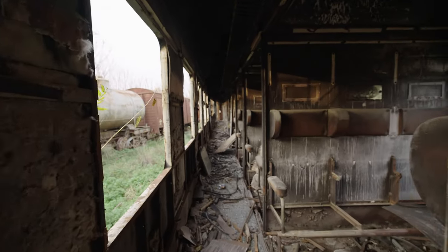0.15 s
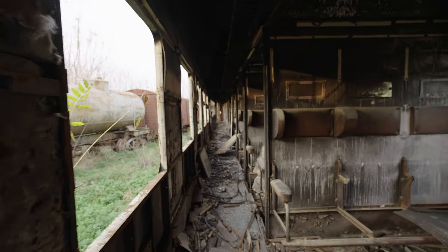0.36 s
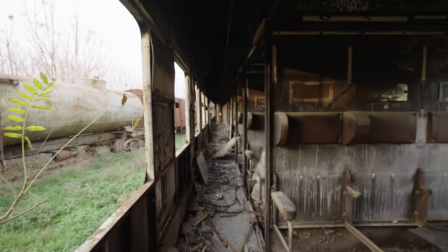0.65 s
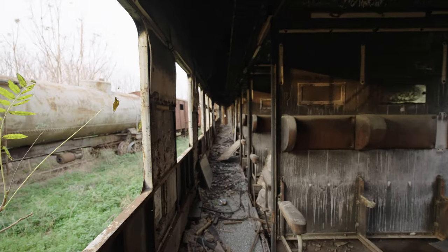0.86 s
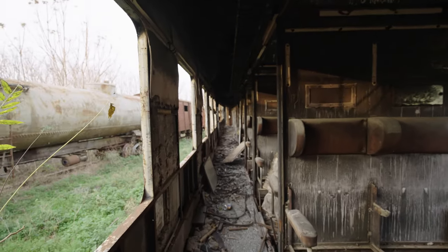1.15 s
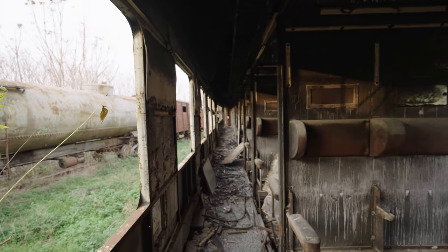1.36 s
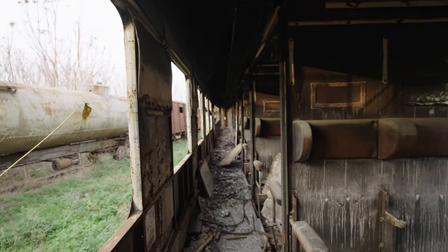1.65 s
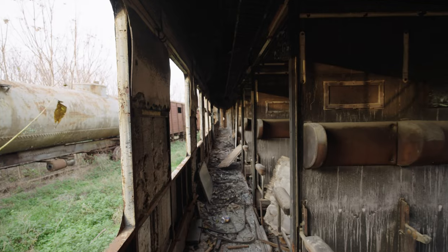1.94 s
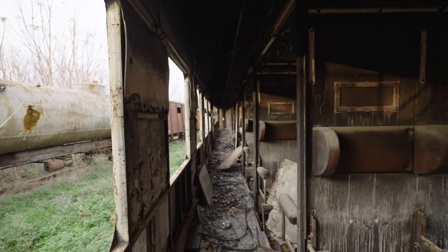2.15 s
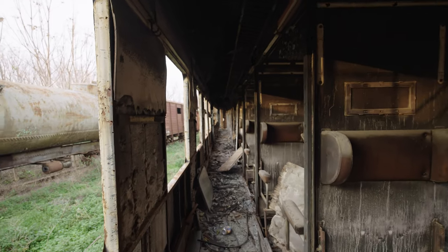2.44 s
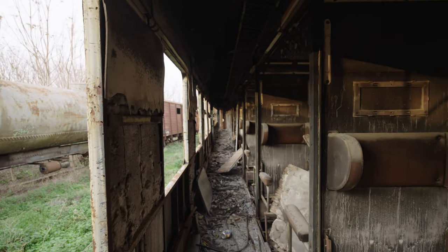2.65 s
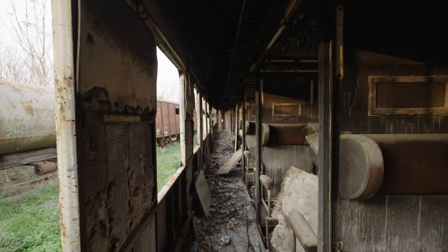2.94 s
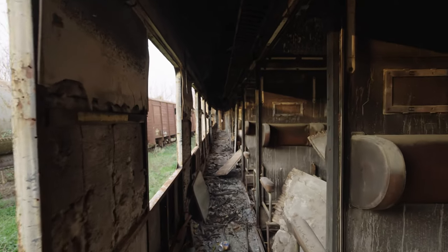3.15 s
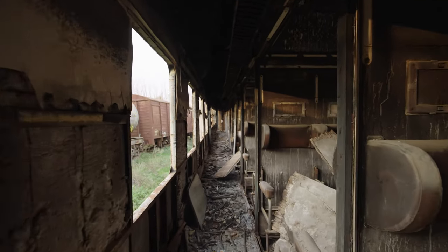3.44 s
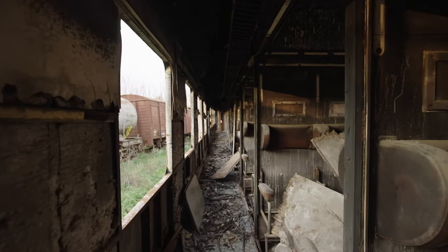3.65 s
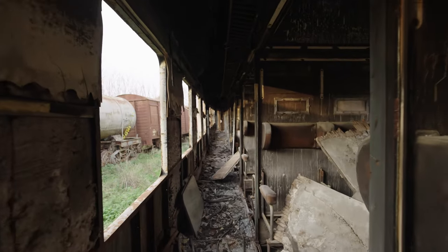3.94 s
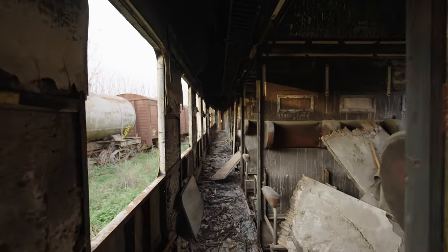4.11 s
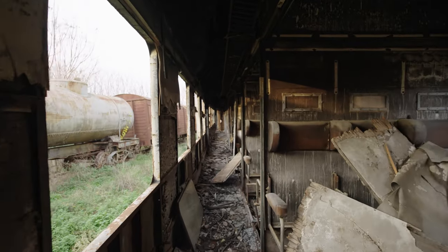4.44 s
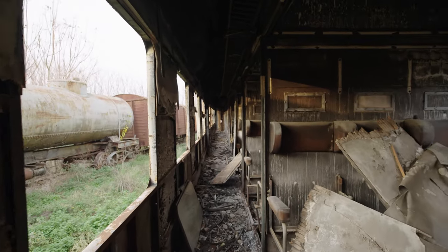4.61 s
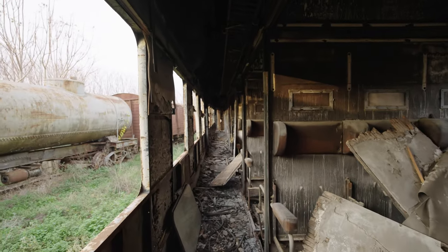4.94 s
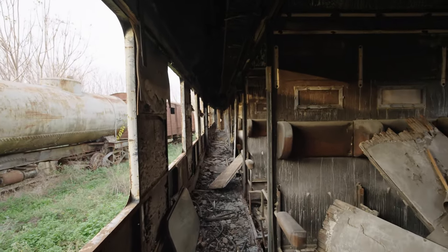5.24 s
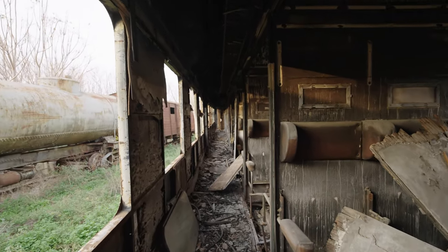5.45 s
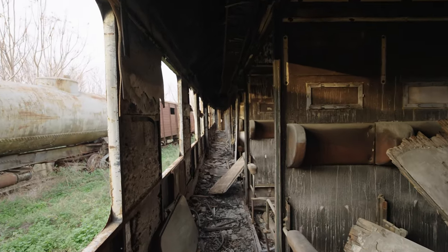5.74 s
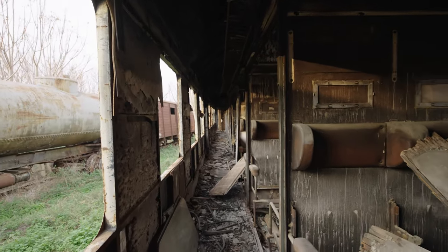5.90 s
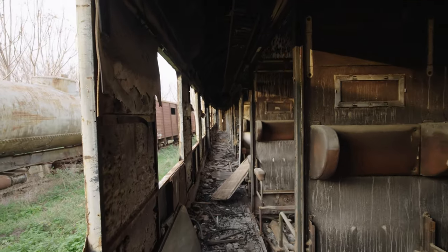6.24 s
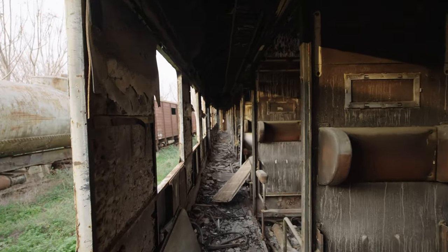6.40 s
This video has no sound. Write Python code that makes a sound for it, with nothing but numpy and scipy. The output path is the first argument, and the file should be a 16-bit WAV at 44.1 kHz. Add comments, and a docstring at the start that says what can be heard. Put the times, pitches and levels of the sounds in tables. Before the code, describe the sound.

Slow footsteps crunch and snap over brittle debris in a derelict railway carriage, glass clinking underfoot, with faint low rumble from outside.

```python
"""Corridor of a derelict railway carriage: slow steps over flakes of paint, board and glass, in one channel.
Each foot thuds on the hollow floor, snaps and splinters pieces and grinds grit; soles scuff, a board creaks,
glass clinks and once squeaks. Blows and grains drive damped resonances, glass is a sum of decaying sines;
the near sound is mixed with a short bright reverberation from the bare compartments.
From farther off, faint rumble and a low hum come through the open windows."""
import sys
import numpy as np
from scipy import signal
from scipy.fft import rfft, irfft
from scipy.io import wavfile
from scipy.ndimage import map_coordinates

SR = 44100
rng = np.random.default_rng(int(sys.argv[2]) if len(sys.argv) > 2 else 0)


def put_to_file(sound):
    """Save the sound as 16-bit audio at rate SR, in the file named by the first command-line argument."""
    columns = np.atleast_2d(sound).T  # one column per channel
    safe = np.clip(columns, -1, 1)
    whole_steps = np.round(safe * 32767)
    wavfile.write(sys.argv[1], SR, whole_steps.astype(np.int16))


N = 289781
TIME = np.arange(N) / SR  # s
BLOW = int(.4 * SR)  # samples kept of each blow and of the reverberation
ATTACK = int(.03 * SR)  # samples over which the level of a blow is set

# Step levels below apply before the carriage body colours them and the steps are trimmed.
# Air outside, spectrum shape before levelling: pitch_hz [Hz], density_db [dB per Hz, relative]
OUTDOOR_AIR = [(35, -33), (60, -0.5), (103, -4), (160, -9), (222, -1.5), (281, -14), (503, -15.5),
               (636, -19), (732, -12), (785, -18), (1410, -22), (7400, -29), (16000, -39)]
AIR_DB = -54.5
# Swelling hum from outside: time_s [s], level_db [dB]
HUM_SWELL = [(0, -67), (5.0, -64.5), (5.5, -53.5), (6.0, -52.5), (6.57, -51.5)]
HUM_HZ = 149
# Weight bearing on the debris: start_s [s], length_s [s], grit_db [dB], boards_db [dB]
FOOT_LOADS = [(0, 0.035, -56.5, -55), (0.304, 0.5, -50.5, -54), (0.762, 0.51, -46.5, -48.5),
              (1.41, 0.27, -51, -52), (1.918, 0.27, -44, -45), (2.31, 0.35, -53, -57.5),
              (2.75, 0.51, -55, -54), (3.112, .32, -47, -47.5), (4.014, 0.36, -52, -48),
              (4.75, .03, -55.5, -54), (4.93, 0.14, -53, -53), (5.182, .08, -53.5, -55),
              (5.321, 0.13, -30.5, -43), (5.586, 0.16, -44.5, -51.5), (5.8, 0.16, -55, -59.5),
              (6.01, 0.3, -42.5, -44.5), (6.462, .11, -56, -52.5)]
LOAD_S, UNLOAD_DB_PER_S = .04, 118  # the weight comes on quickly and eases off
GRIT_REST_DB, BOARDS_REST_DB = -76, -57.5  # under the standing foot
# Soles sliding and a board creaking (the 1450 Hz row at 1.95 s is the creak):
# start_s [s], peak_s [s], end_s [s], level_db [dB], pitch_hz [Hz], grain_rate [grains per s]
SCUFFS_AND_CREAK = [(0.255, 0.258, .34, -34.5, 3930, 3000), (1.953, 2.147, 2.25, -36.5, 1450, 280),
                    (1.949, 2.168, 2.3, -35, 7900, 1100), (2.188, 2.215, 2.265, -37.5, 4500, 3000),
                    (2.875, 2.936, 2.962, -25.5, 1210, 3000), (2.872, 2.95, 2.98, -26, 6200, 7100),
                    (3.949, 3.999, 4.1, -32, 5970, 4800), (3.959, 4.082, 4.12, -35, 1400, 1800),
                    (5.322, 5.427, 5.5, -27, 3970, 690), (5.33, 5.457, 5.5, -26.5, 8650, 1100),
                    (5.572, 5.655, 5.74, -31, 8050, 970)]
# Pieces breaking under the shoe: start_s [s], snap_db [dB], snap_hz [Hz], splinter_db [dB],
# splinter_hz [Hz], direct [share of the snap's power that arrives directly, 0-1]
BREAKING_PIECES = [(.265, -36.5, 1860, -38.5, 7500, 0.23), (.301, -37, 1630, -37.5, 6800, 0.55),
                   (.49, -51, 2500, -55, 9000, .1), (0.539, -45.5, 1290, -46, 8100, 0.82),
                   (.5716, -35, 1480, -30, 5800, 0.88), (0.7133, -46.5, 1690, -36.5, 11600, 0.05),
                   (0.7519, -34.5, 1400, -20.5, 10760, 0.43), (0.8222, -52, 1000, -35.5, 5000, 0.3),
                   (.8827, -41, 1300, -42, 6800, .12), (0.9932, -39.5, 1910, -39.5, 7900, 0.4),
                   (1.053, -41, 2220, -43, 6850, 0.7), (1.1436, -34, 2140, -45, 6900, .67),
                   (1.219, -34.5, 1930, -32, 7900, 0.47), (1.308, -45.5, 1560, -43.5, 6100, .8),
                   (1.468, -39.5, 1600, -43, 6000, 0.35), (1.53, -50, 1320, -42, 8800, 0.2),
                   (1.6421, -40, 1570, -39, 3970, 0.4), (1.755, -35.5, 1450, -40.5, 10500, 0.5),
                   (1.7745, -38, 920, -35.5, 4900, .37), (1.871, -32.5, 1170, -34.5, 7100, 0.68),
                   (1.9277, -39.5, 4530, -44, 11900, .27), (2.0188, -37.5, 1230, -36, 7000, 0.64),
                   (2.1025, -42.5, 1460, -36, 7900, 0.45), (2.211, -50, 3000, -32.5, 5240, 0.33),
                   (2.343, -56.5, 2740, -46.5, 12000, 0.26), (2.3742, -53, 1150, -45.5, 6000, 0.54),
                   (2.5443, -57, 900, -43, 8400, 0.44), (2.6149, -54.5, 1320, -44.5, 10700, 0.3),
                   (2.7413, -64, 1150, -49, 5930, 0.7), (2.845, -50, 1910, -44.5, 7900, 0.08),
                   (3.092, -45, 855, -45.5, 5860, 0.57), (3.1706, -36.5, 930, -33, 9100, 0.44),
                   (3.265, -48.5, 1040, -39.5, 8060, .1), (3.318, -49.5, 1160, -43.5, 6960, 0.7),
                   (3.4212, -29, 1100, -33, 4600, .3), (3.467, -46.5, 2450, -43, 8500, 0.5),
                   (3.6794, -47, 1700, -45.5, 7500, 0.36), (3.725, -48, 2000, -45.5, 8500, 0.16),
                   (4.0708, -30, 850, -40.5, 7850, 0.45), (4.1156, -29.5, 3480, -27, 8300, 0.64),
                   (4.252, -56, 4000, -32.5, 10950, 0.2), (4.31, -50.5, 1160, -47, 4440, 0.04),
                   (4.7709, -51.5, 1490, -43, 6740, 0.18), (4.9811, -45, 870, -43.5, 5030, 0.55),
                   (5.0336, -45.5, 1150, -41, 5940, 0.13), (5.277, -53, 1890, -40.5, 6900, 0.33),
                   (5.2968, -45, 880, -32.5, 5070, 0.7), (5.3221, -38.5, 1570, -26.5, 5170, .46),
                   (5.3855, -34.5, 2190, -30, 4570, .7), (5.433, -31, 1190, -30, 7850, 0.34),
                   (5.469, -28, 3320, -35, 7900, 0.4), (5.5286, -23, 2560, -21, 7400, 0.86),
                   (5.582, -35.5, 2080, -36, 9100, 0.46), (5.603, -43, 1890, -28, 8060, 0.45),
                   (5.633, -39, 1520, -27.5, 7300, 0.6), (5.773, -37, 1580, -28, 5350, 0.42),
                   (5.944, -42.5, 1590, -35.5, 7800, 0.6), (5.9988, -32, 2020, -28, 6740, 0.42),
                   (6.041, -30, 1990, -29, 7800, 0.17), (6.108, -52, 1020, -37, 8700, 0.24),
                   (6.1946, -25, 1300, -33.5, 4500, 0.43), (6.2335, -33.5, 1870, -28, 4950, .95),
                   (6.316, -33.5, 2400, -33.5, 7050, 0.06), (6.368, -50, 1330, -34, 7000, 0.7),
                   (6.423, -46.5, 2130, -40, 7900, .38), (6.473, -42.5, 1830, -39, 7800, 0.55)]
# Modes of a flat broken piece or a board: pitch_ratio [multiple of its pitch], level_db [dB, relative]
PIECE_MODES = [(.8, -1), (1.0, -0.5), (1.3, -8.5), (1.9, -10.5)]
# A foot loading the floor: start_s [s], level_db [dB], pitch_hz [Hz]
FOOTFALLS = [(.273, -28.5, 249), (.572, -44.5, 332), (.76, -45.5, 270), (.835, -44.5, 257),
             (.892, -38.5, 222), (1.466, -47, 260), (1.541, -38, 190), (1.613, -39.5, 213),
             (1.642, -37.5, 332), (1.871, -42.5, 267), (2.02, -41.5, 282), (2.1, -42, 290),
             (2.235, -42.5, 210), (2.371, -47.5, 340), (2.876, -36, 310), (2.922, -30.5, 380),
             (3.169, -37, 368), (3.265, -48.5, 280), (3.421, -28, 322), (3.68, -49, 340), (3.717, -42, 241),
             (4.03, -41, 259), (4.068, -36, 404), (4.118, -36.5, 116), (4.979, -38.5, 159),
             (5.296, -47, 200), (5.398, -42.5, 210), (6.031, -32, 207), (6.194, -34, 464),
             (6.211, -37.5, 112)]
SETTLE_S, SETTLE_DB, SETTLE_PITCH = .03, -10.5, 0.68  # the sole settles later, softer and deeper
# Glass knocked or squeaking under the sole (the pair at 3.57 s is one short squeak):
# start_s [s], level_db [dB], pitch_ratio [multiple of the glass modes],
# rattle_db [dB over the ring], freedom [ring length relative to a free shard]
GLASS_SOUNDS = [(2.416, -42, 0.93, 7, 0.59), (3.569, -34, 1.01, -6, 1.15), (3.573, -34.5, 0.99, -6.5, 0.65),
                (4.251, -37, 0.84, 0, 0.45), (4.254, -34, 0.57, 0, 0.42), (4.697, -49.5, 0.73, 15, .7),
                (5.201, -46.5, 0.73, 1, .6), (5.297, -38, 0.66, -6, 0.45), (5.322, -31.5, 0.48, -3, 1),
                (5.384, -27, 0.47, 6, 0.85)]
# Modes of a free glass shard at pitch ratio 1: pitch_hz [Hz], level_db [dB, relative], t60_s [s]
GLASS_MODES = [(2840, -8, 0.073), (4210, -6, 0.13), (5740, -16, .16), (6980, 1.5, 0.15), (8430, 1, 0.062),
               (10100, -2, 0.1), (10780, -13, 0.08), (11400, -1.5, 0.095), (13200, -5, .1),
               (12600, -12, .08)]
# Resonances of floor and carriage: pitch_hz [Hz], width_hz [Hz], boost_db [dB]
CARRIAGE_BODY = [(95, 67, 6), (204, 49, 1), (370, 13, 2.5), (606, 13, 4), (903, 9, 4), (1126, 210, 1),
                 (3730, 1800, 3.5), (13000, 1600, 2)]
CARRIAGE_T60_S, BUILD_UP_S = 0.18, .003


def from_db(db):
    """Decibels to gain."""
    return 10 ** (np.asarray(db) / 20)


def rms_one(x):
    """Scale to unit rms."""
    return x / np.sqrt(np.mean(x ** 2) + 1e-20)


def attack_one(x):
    """Scale a blow to unit rms over its first 30 ms."""
    return x / np.sqrt(np.mean(x[:ATTACK] ** 2) + 1e-20)


def below_limit(hz):
    """Keep a frequency safely under half the sample rate."""
    return min(hz, .45 * SR)


def band(x, hz, spread):
    """Band-pass from hz / spread to hz * spread."""
    edges = [hz / spread, below_limit(hz * spread)]
    return signal.sosfilt(signal.butter(2, edges, "band", fs=SR, output="sos"), x + 1e-18)


def resonance(x, hz, width_hz):
    """Two-pole resonance with gain about 1 at its peak."""
    r = np.exp(-np.pi * width_hz / SR)
    numerator = np.array([1, 0, -1]) * (1 - r * r) / 2
    denominator = [1, -2 * r * np.cos(2 * np.pi * hz / SR), r * r]
    return signal.lfilter(numerator, denominator, x + 1e-18)


def add(out, s, sound):
    """Mix a sound in at time s."""
    at = round(s * SR)
    out[at:at + len(sound)] += sound[:N - at]


def drift(rate, size):
    """A smooth random wobble through knots of spread 1, rate knots per second."""
    knots = rng.standard_normal(int(size / SR * rate) + 3)
    return map_coordinates(knots, [np.arange(size) / SR * rate], order=3, mode="nearest")


def grains(per_s, size_db, size=N):
    """Random clicks, mostly small and a few large."""
    sizes = from_db(size_db * np.minimum(rng.exponential(1, size), 3))
    return sizes * rng.choice([-1, 1], size) * (rng.random(size) < per_s / SR)


def reflections(t60, early_per_s=3500, hold_s=0.0053, clump_db=2.0, late_db=-24, late_t60=0.88):
    """Near walls send clumped echoes that hold briefly and die fast; the long corridor rings on faintly."""
    t = TIME[:BLOW]
    density = np.minimum(early_per_s / SR * (1 + (t / BUILD_UP_S / 2) ** 2), 1)
    echoes = rng.standard_normal(BLOW) * (rng.random(BLOW) < density) / np.sqrt(density)
    early = from_db(-60 * np.maximum(t - hold_s, 0) / t60)
    late = from_db(late_db - 60 * t / late_t60)
    build_up = 1 - np.exp(-t / BUILD_UP_S)
    clumps = from_db(clump_db * drift(160, size=BLOW))
    return echoes * build_up * np.hypot(early, late) * clumps


def in_carriage(x, direct):
    """A running sound plus its reverberation, sharing the power by the direct share."""
    echoes = reflections(CARRIAGE_T60_S)
    far = signal.fftconvolve(x, echoes / np.linalg.norm(echoes))[:N]
    return np.sqrt(direct) * x + np.sqrt(1 - direct) * far


def blow(force, hz, spread, direct, t60, ring_db=-20, q=14):
    """A force on a damped piece: a broad knock and a brief ring, heard directly and through the carriage."""
    modes = np.zeros(BLOW)
    for ratio, db in PIECE_MODES:
        mode_hz = below_limit(hz * ratio * rng.uniform(0.916, 1.03))  # no two pieces alike
        modes += from_db(db) * resonance(force, mode_hz, hz * ratio / q)
    near = attack_one(band(force, hz, spread)) + from_db(ring_db) * attack_one(modes)
    far = signal.fftconvolve(near, reflections(t60))[:BLOW]
    return attack_one(np.sqrt(direct) * attack_one(near) + np.sqrt(1 - direct) * attack_one(far))


def outdoors():
    """Steady rumble and hiss as shaped noise, and a hum of a pure tone with noise ringing around it."""
    hz, density_db = np.transpose(OUTDOOR_AIR)
    bins_hz = np.arange(N // 2 + 1) * SR / N
    colour = from_db(np.interp(np.log(bins_hz + 1), np.log(hz), density_db))
    air = rms_one(irfft(rfft(rng.standard_normal(N)) * colour, N))
    tone = np.sin(2 * np.pi * HUM_HZ * TIME)
    waver = rms_one(resonance(rng.standard_normal(N), HUM_HZ, width_hz=8.3))
    hum = rms_one(tone + .5 * waver)
    swell_s, swell_db = np.transpose(HUM_SWELL)
    return from_db(AIR_DB) * air + from_db(np.interp(TIME, swell_s, swell_db)) * hum


def weight():
    """Gains of grit and boards: every tread rises, holds and eases off to the load of the standing foot."""
    power = from_db([[GRIT_REST_DB], [BOARDS_REST_DB]]) ** 2
    for start, length, grit_db, boards_db in FOOT_LOADS:
        rise = np.clip((TIME - start) / LOAD_S + .5, 0, 1)  # half loaded at the start time
        release_db = UNLOAD_DB_PER_S * np.maximum(TIME - start - length, 0)
        power = power + (from_db([[grit_db], [boards_db]]) * rise * from_db(-release_db)) ** 2
    return np.sqrt(power)


def grit(load, coarse_db=-4, fine_db=-1):
    """Small grains keep popping under the shoe, ringing at a spread of coarse and fine pitches."""
    coarse = sum(rms_one(resonance(grains(per_s=18, size_db=5), hz, hz * 0.22))
                 for hz in np.geomspace(800, 3000, 8))
    fine = sum(rms_one(resonance(grains(per_s=40, size_db=3), hz, hz * 0.32))
               for hz in np.linspace(3800, 15000, 9))
    coarse = load * from_db(coarse_db) * rms_one(coarse)
    fine = load * from_db(fine_db) * rms_one(fine)
    return in_carriage(coarse, direct=0.34) + in_carriage(fine, direct=0.29)


def boards(load, gain_db=-3):
    """Dull little knocks of loose boards under the weight: sparse clicks in a low band."""
    knocks = rms_one(band(grains(per_s=180, size_db=3.5), hz=243, spread=2.01))
    return in_carriage(load * from_db(gain_db) * knocks, direct=0.22)


def scuffs_and_creak(spread=1.85, edge_db=-17, slip_db=3, ring_db=-4):
    """Sliding soles crush grains that ring, and a board creaks by stick-slip: both are swelling click trains."""
    out = np.zeros(N)
    for start, peak, end, level_db, hz, per_s in SCUFFS_AND_CREAK:
        t = TIME[(TIME >= start) & (TIME < end)]
        swell = from_db(level_db + np.interp(t, [start, peak, end], [edge_db, 0, edge_db]))
        unevenness = from_db(slip_db * drift(110, size=len(t)))
        force = unevenness * grains(per_s=per_s, size_db=3.5, size=len(t))  # dense hisses, sparse crackles
        rings = sum(from_db(db) * resonance(force, below_limit(hz * ratio), hz * ratio / 14)
                    for ratio, db in PIECE_MODES)
        friction = rms_one(band(force, hz, spread)) + from_db(ring_db) * rms_one(rings)
        fade = signal.windows.tukey(len(t), .2)
        add(out, start, fade * swell * rms_one(friction))
    return in_carriage(out, direct=0.6)


def cracks(snap_spread=1.88, splinter_spread=1.77, snap_t60=0.18, tear_s=0.0012, tear_db=-7,
           crumble_s=0.0017, shadow_db=-11, first_db=20):
    """A piece snaps in one pulse and tears within a millisecond or two; a brief bright shower goes with it."""
    out, pulse, t = np.zeros(N), -signal.unit_impulse(BLOW), TIME[:BLOW]
    for s, snap_db, snap_hz, splinter_db, splinter_hz, direct in BREAKING_PIECES:
        tear = grains(per_s=4000, size_db=2, size=BLOW) * np.exp(-t / tear_s)
        fracture = pulse + from_db(tear_db) * tear
        snap = blow(fracture, snap_hz, snap_spread, direct, snap_t60, ring_db=-6, q=9.9)
        add(out, s, from_db(snap_db) * snap)
        # a piece hidden under the sole crumbles softly; the shoe shades the splinters most
        crumbs = grains(per_s=1100, size_db=5.0, size=BLOW) * np.exp(-t / crumble_s)
        shower = from_db(first_db) * direct * fracture + crumbs
        splinters = blow(shower, splinter_hz, splinter_spread, direct * from_db(shadow_db),
                         CARRIAGE_T60_S, ring_db=-4.5, q=5.6)
        add(out, s, from_db(splinter_db) * splinters)
    return out


def thuds(spread=1.474, direct=0.49, t60=0.095, cycles=14):
    """The hollow floor gives under the heel, then again as the sole settles; deep thuds last longer."""
    out = np.zeros(N)
    for heel in FOOTFALLS:
        sole = (heel[0] + SETTLE_S, heel[1] + SETTLE_DB, heel[2] * SETTLE_PITCH)
        for s, level_db, hz in (heel, sole):
            thud = blow(signal.unit_impulse(BLOW), hz, spread, direct, t60 + cycles / hz, ring_db=-5, q=6.1)
            add(out, s, from_db(level_db) * thud)
    return out


def glass(direct=0.15):
    """Glass knocked or squeaking under the sole: a rattle and a ring in one set of scaled, decaying modes."""
    out, t = np.zeros(N), TIME[:BLOW]
    for s, level_db, pitch, rattle_db, freedom in GLASS_SOUNDS:
        modes = sum(from_db(db - 60 * t / (t60 * freedom)) * np.sin(2 * np.pi * hz * pitch * t)
                    for hz, db, t60 in GLASS_MODES)
        ring = modes * (1 + .45 * drift(250, size=BLOW))  # wavers at random
        rattle = blow(signal.unit_impulse(BLOW), 8000 * pitch, 1.56, direct, CARRIAGE_T60_S)
        mixed = attack_one(ring) + from_db(rattle_db) * attack_one(rattle)
        add(out, s, from_db(level_db) * attack_one(mixed))
    return out


def scene():
    """The steps, coloured by the carriage body, with the glass, over the outdoor air."""
    background = outdoors()
    on_grit, on_boards = weight()
    steps = grit(on_grit) + boards(on_boards) + scuffs_and_creak() + cracks() + thuds()
    steps = steps + sum((from_db(db) - 1) * resonance(steps, hz, width) for hz, width, db in CARRIAGE_BODY)
    return (from_db(-0.5) * steps + glass() + background)[None]


def record(dry):
    """At the microphone: a steep wind filter takes the deep bass, peaks are rounded, the top is cut."""
    wind_filter = signal.ellip(8, .5, 42, 76, "high", fs=SR, output="sos")
    x = signal.sosfilt(wind_filter, dry)
    x = .45 * np.tanh(x / .45)
    top_cut = signal.ellip(10, .2, 70, 16200, fs=SR, output="sos")
    return signal.sosfilt(top_cut, x)


dry = scene()
out = record(dry)
put_to_file(out)
```